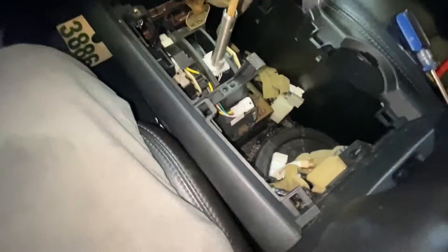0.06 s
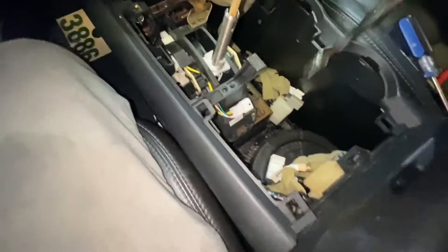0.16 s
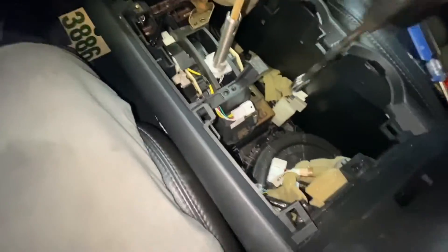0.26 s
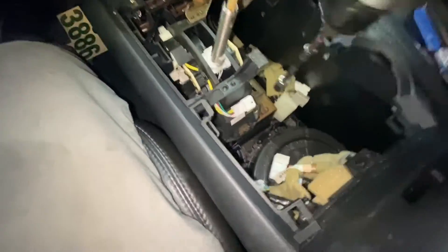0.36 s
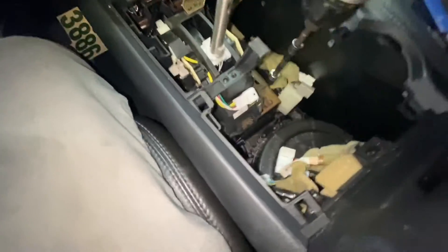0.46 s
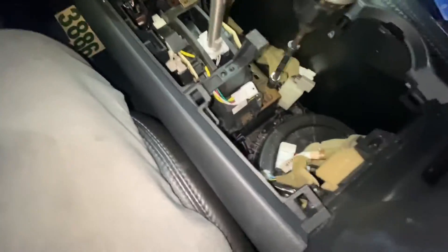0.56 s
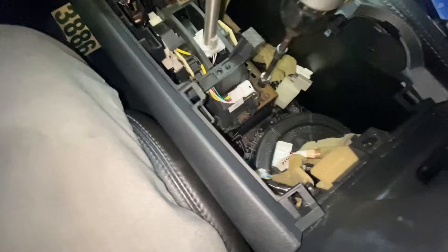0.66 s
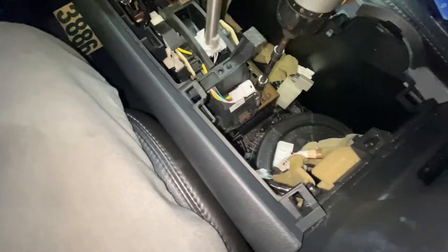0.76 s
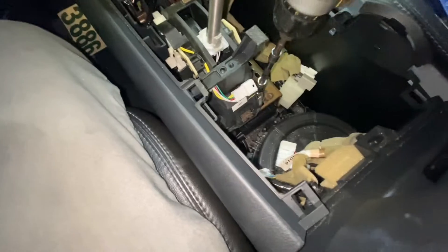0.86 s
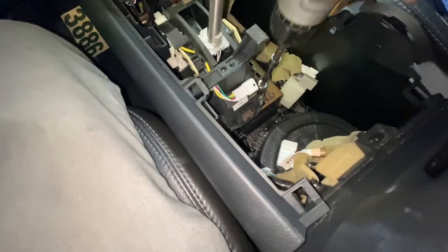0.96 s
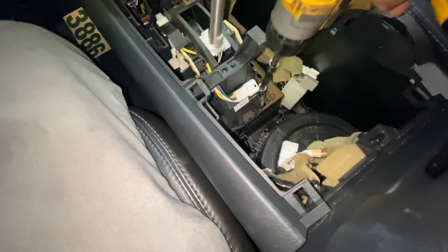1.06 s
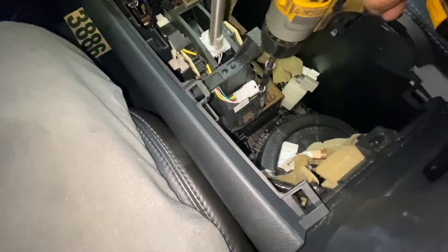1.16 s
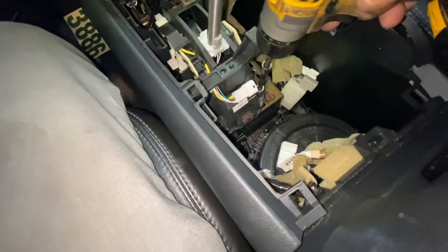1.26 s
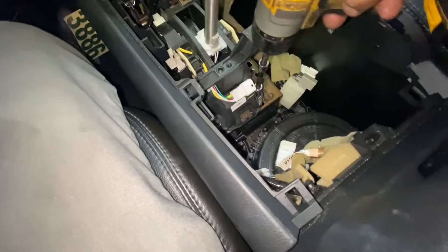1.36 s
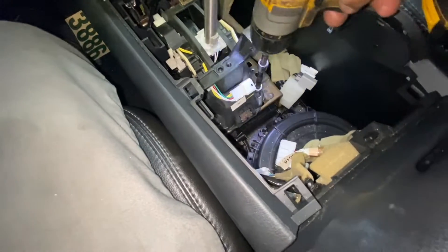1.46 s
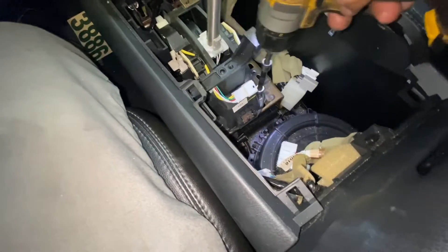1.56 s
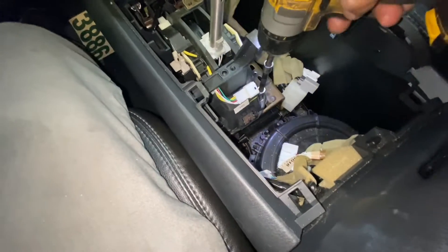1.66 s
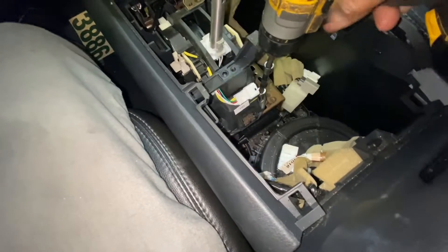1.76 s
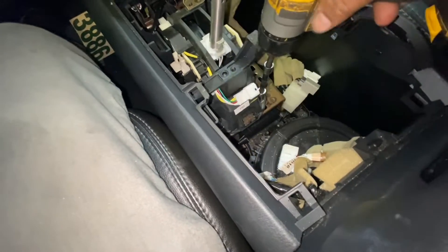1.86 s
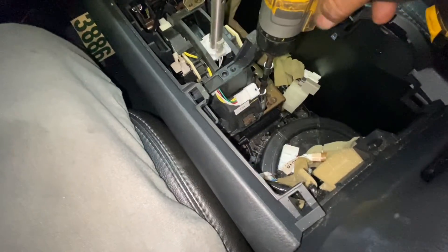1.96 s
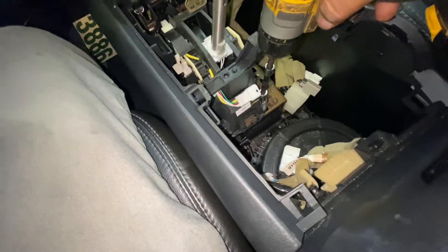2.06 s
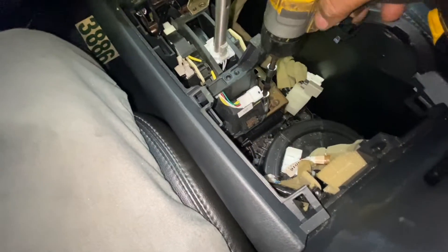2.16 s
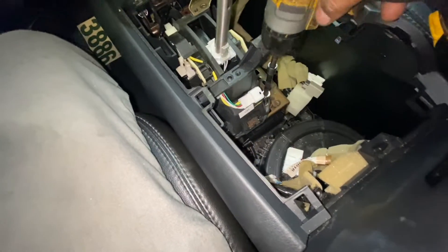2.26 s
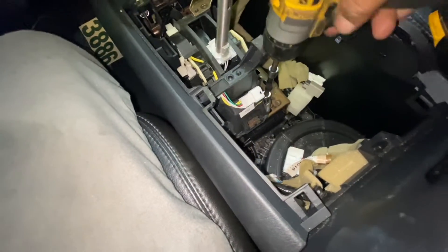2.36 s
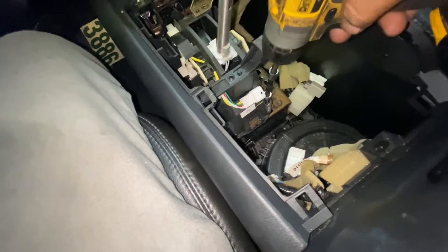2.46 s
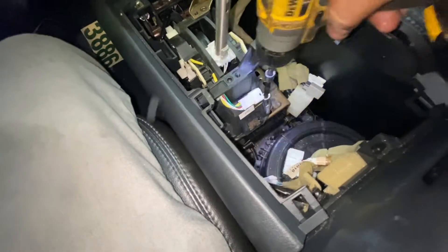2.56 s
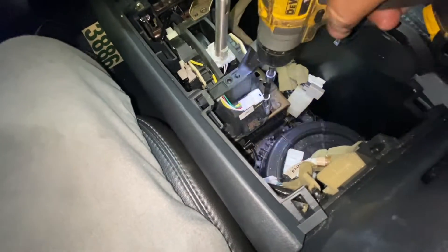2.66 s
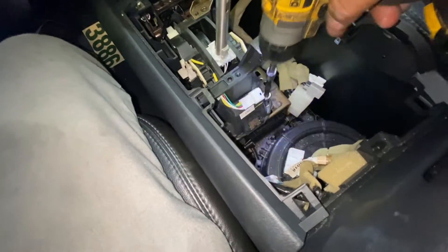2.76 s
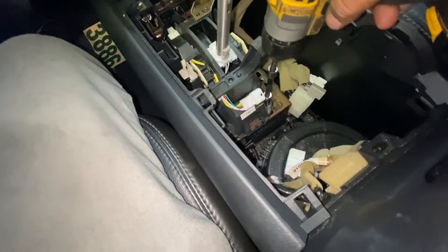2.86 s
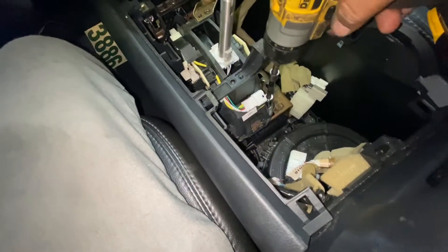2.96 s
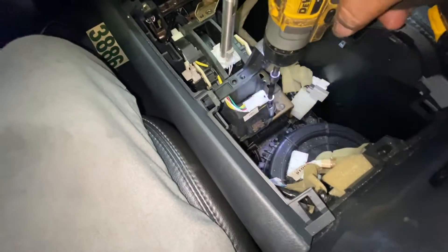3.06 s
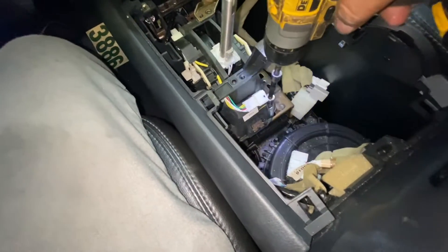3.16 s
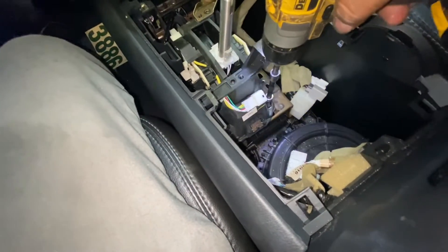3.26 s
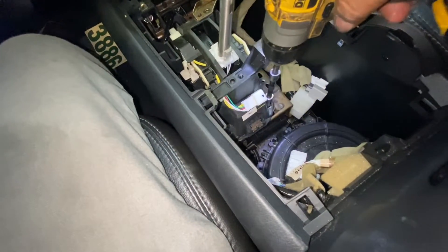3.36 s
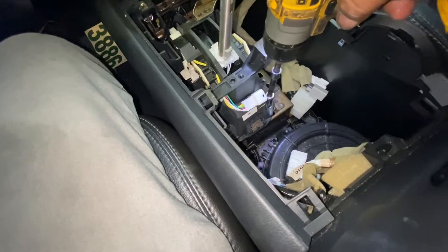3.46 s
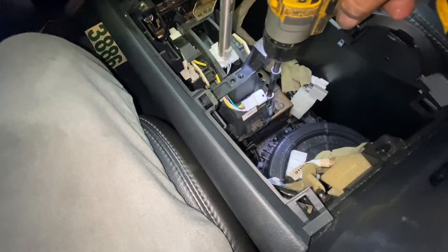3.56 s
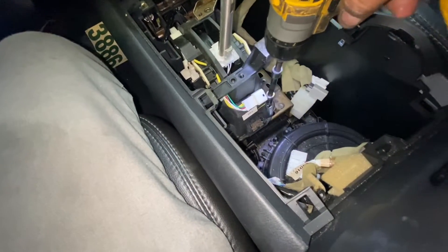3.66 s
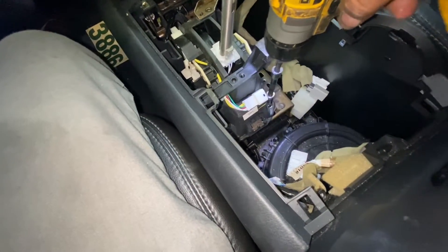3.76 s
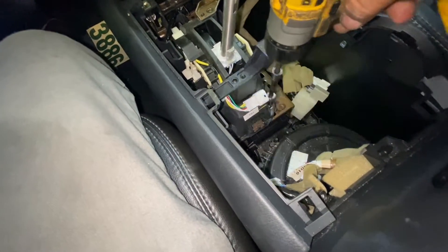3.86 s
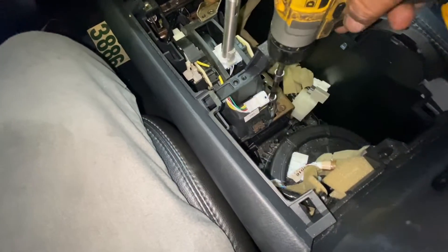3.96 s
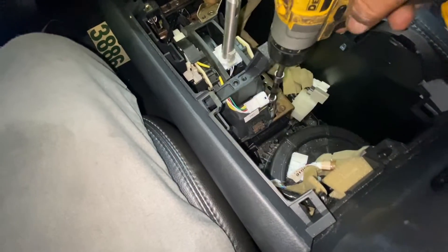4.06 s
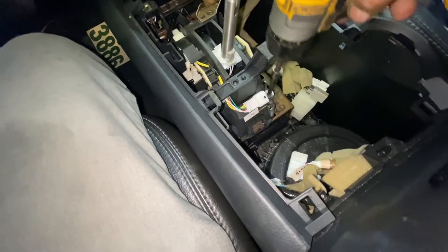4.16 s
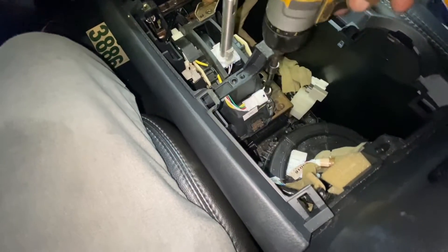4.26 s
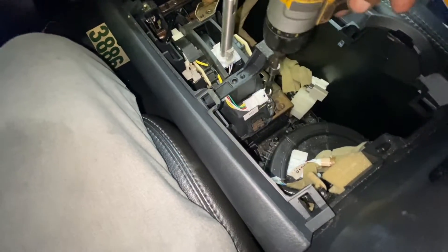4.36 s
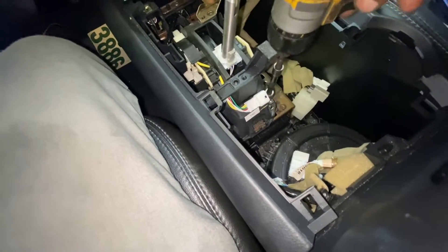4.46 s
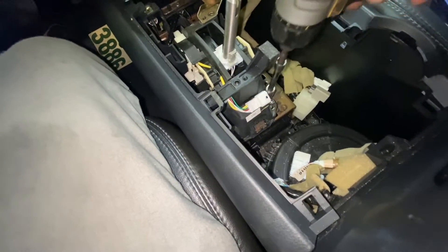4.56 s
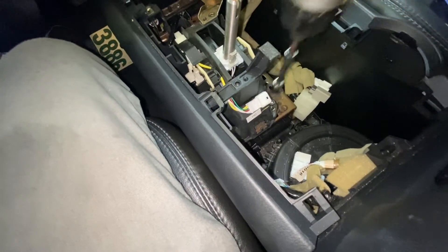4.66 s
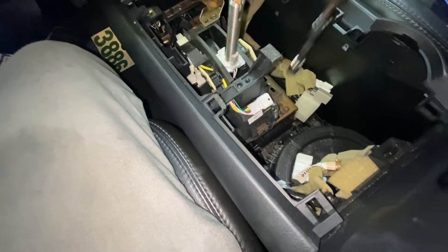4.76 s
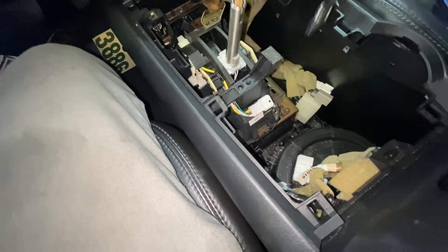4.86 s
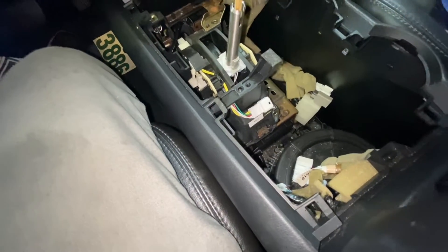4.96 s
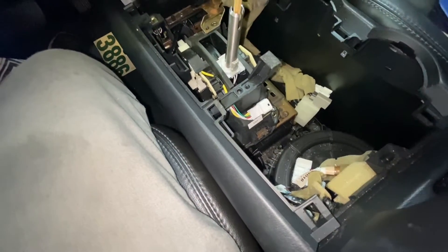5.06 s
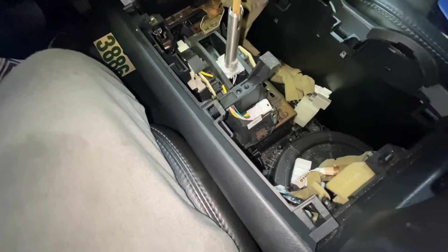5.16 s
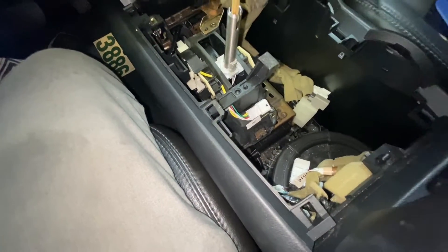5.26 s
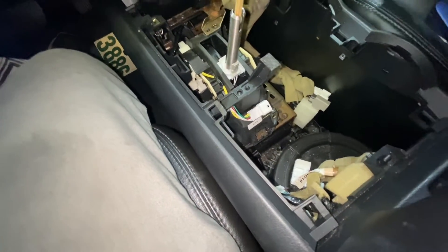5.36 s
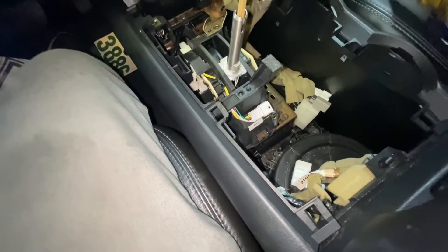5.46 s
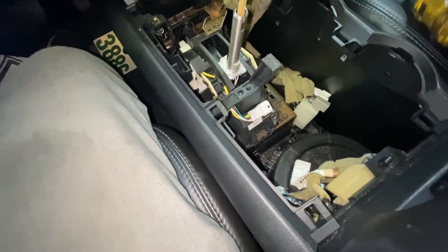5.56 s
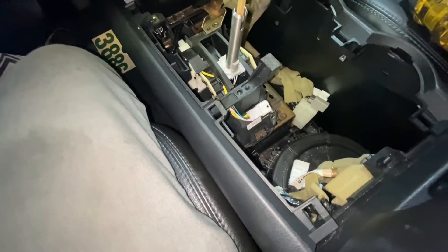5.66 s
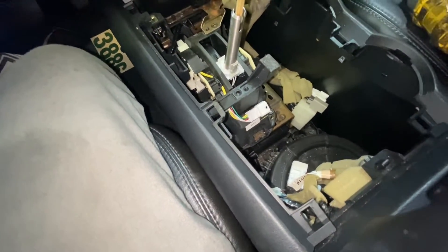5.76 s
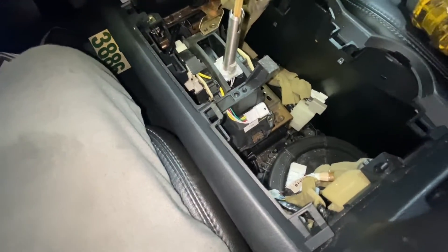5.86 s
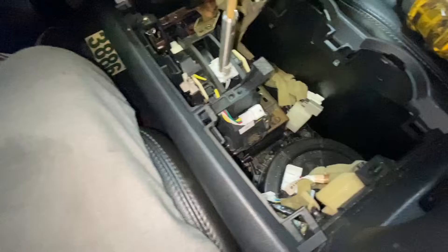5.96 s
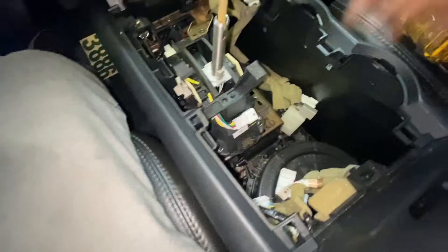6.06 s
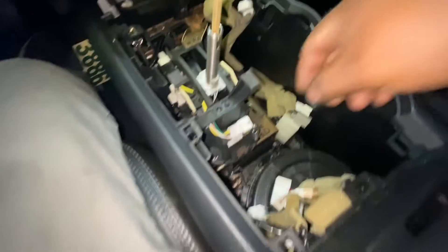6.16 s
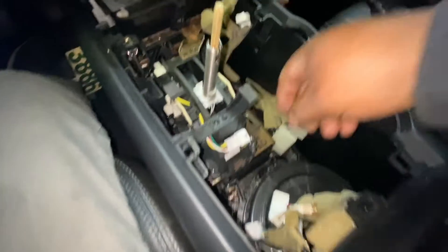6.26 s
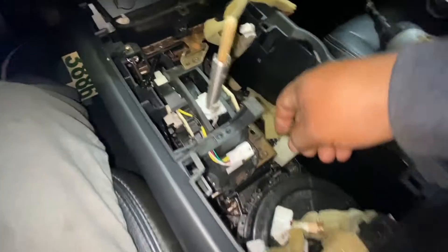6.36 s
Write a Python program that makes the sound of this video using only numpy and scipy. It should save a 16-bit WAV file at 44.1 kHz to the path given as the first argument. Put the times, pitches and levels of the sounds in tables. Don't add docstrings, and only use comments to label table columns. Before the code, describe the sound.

Close in a small padded car cabin, a driver bit ticks and scrapes against metal and plastic. A sharp crack and thump lead into a brief impact rattle; a second follows a second later. Then the motor whirrs steadily for under a second, ending in jolting knocks. Afterwards there are light taps, cloth rustle and a low faint hum. Close stereo microphones, dry sound.

```python
import sys
import numpy as np
from scipy import signal
from scipy.fft import rfft, irfft
from scipy.io import wavfile
from scipy.ndimage import uniform_filter1d

SR = 44100
rng = np.random.default_rng(int(sys.argv[2]) if len(sys.argv) > 2 else 0)


def voltage_ratio(level):
    return 10 ** (np.asarray(level, float) / 20)


def put_to_file(sound):
    columns = np.atleast_2d(sound).T
    safe = np.clip(columns, -1, 1)
    whole_steps = np.round(safe * 32767)
    wavfile.write(sys.argv[1], SR, whole_steps.astype(np.int16))


N = 283122

# f/Hz, level per Hz/dB
HOUSING = [(350, -27.5), (600, 7), (725, -8.5), (787, -0.5), (1680, -2), (2520, -1), (3300, -8),
           (3800, -4.5), (4300, -7), (5300, -2), (6090, -1.5), (7000, -12.5), (7880, -13.5), (9200, -13.5),
           (10200, -6.5), (12000, -11), (13000, -9), (15300, -15.5)]
# f/Hz, level per Hz/dB
CONTACT_TREBLE = [(2060, -32), (3750, -11), (4400, -1), (5020, 1), (6900, -7), (10500, -4.5), (11200, -11),
                  (12200, -22.5), (13600, -14.5), (14600, -18), (15500, -22)]
# t/s, half length/s, rustle level/dB, fine brushing over it/dB
CLOTH_MOVES = [(0.067, 0.094, -65, -21), (0.248, 0.23, -71.5, -17), (0.414, 0.061, -66, -14.5),
               (0.666, 0.043, -72, -11), (0.994, 0.37, -78, -18.5), (1.186, 0.052, -76.5, -8),
               (1.81, 0.082, -82.5, -27), (2.28, 0.022, -66.5, -8.5), (2.306, 0.012, -56, -33),
               (2.491, 0.019, -67, -3.5), (2.858, 0.053, -78, -36), (3.939, 0.057, -102, -65),
               (4.085, 0.063, -93, -30), (4.487, 0.021, -80.5, -24), (5.43, 0.12, -79, -7.5),
               (0.154, 0.047, -74, -29), (5.61, 0.27, -99, 2), (.31, 0.027, -74, -3)]


def motor():
    # t/s, level/dB
    pulls = [
        [(1.38, -66), (1.435, -57), (1.49, -50), (1.55, -32.5), (1.63, -33), (1.68, -50), (1.71, -76),
         (1.76, -80)],
        [(2.45, -79), (2.49, -57), (2.52, -27.5), (2.64, -34.5), (2.665, -41.5), (2.75, -42.5), (2.785, -51.5),
         (2.81, -67), (2.86, -87.5)],
        [(3.01, -74.5), (3.04, -56), (3.075, -37.5), (3.61, -37.5), (3.7, -37), (3.83, -37.5), (3.86, -68),
         (3.89, -96), (3.94, -88)],
    ]
    grip_levels = [-23.5, -27.5, -29]
    # t/s, shaft speed f/Hz, whine level/dB
    spin = [(3.05, 201.6, -51), (3.15, 242.2, -35.5), (3.235, 264.2, -37.5), (3.298, 264.4, -34),
            (3.622, 269.9, -34.5), (3.68, 258.7, -41), (3.7, 276, -35.5), (3.775, 249.6, -39),
            (3.85, 244.7, -50)]
    # f/Hz, width/Hz, level/dB
    console = [(149, 72, -5), (205, 310, -3.5), (267, 58, -1), (292.7, 21, -4.5), (361.8, 36, -8),
               (483, 18, -11.5), (562, 270, -18)]
    # f/Hz, width/Hz, level/dB
    frame = [(100.6, 7.6, 1), (133.4, 43, -9)]
    full_effort_db, shake_share, settle_db_per_s = -33.5, 0.75, 334.5
    bit_hz = 14.1
    t = np.arange(N) / SR

    spinning, (shaft_hz, whine_db) = curves(spin)
    turns = np.cumsum(shaft_hz) / SR
    whirr = gear_whirr(spinning, turns)
    wobble = 1 + (.2 + .4 * spinning) * np.cos(2 * np.pi * bit_hz * (t - 3.175))
    shake = evened(body(grainy(1.3, size=200), console) * wobble)

    out = np.zeros(N)
    fall = settle_db_per_s * t
    for rows, grip_db in zip(pulls, grip_levels):
        gate, (whirr_db,) = curves(rows)
        drive_db = grip_db + shake_share * (whirr_db - full_effort_db)
        shake_db = np.maximum.accumulate(drive_db + fall) - fall
        out += gate * (voltage_ratio(whirr_db + 2.0) * whirr + voltage_ratio(shake_db - 2.0) * shake)

    span = spinning > 0
    out[span] += (spinning * voltage_ratio(whine_db))[span] * shaft_whine(turns[span])
    out += spinning * voltage_ratio(shake_db - 8.0) * evened(body(grainy(1.2, size=400), frame) * wobble)
    return out


def gear_whirr(spinning, turns):
    grind = patchy(grainy(0.72, size=240), spread_db=3.5)
    pulse = np.cos(2 * np.pi * turns)
    treble = signal.butter(2, 6500, "highpass", fs=SR, output="sos")
    treble_pulses = signal.sosfilt(treble, grind * pulse)
    return colour(grind * (1 + .4 * pulse) + 1.1 * spinning * treble_pulses, HOUSING)


def shaft_whine(turns):
    # multiple, level/dB
    multiples = [(3, -13.5), (20, -6), (22, -15), (23, -4.5), (24, -5.5), (29, -6), (30, -15), (31, 0.5),
                 (32, -6), (33, -3.5), (34, 0.5), (35, -11), (36, -9), (37, 7), (38, -19), (39, 2),
                 (40, 5.5), (41, -23), (42, -1.5), (43, -11), (44, -3), (45, 5.5)]
    waver = uniform_filter1d(rng.standard_normal((len(multiples), len(turns))), 900, axis=1)
    lines = np.zeros(len(turns))
    for (k, db), w in zip(multiples, waver):
        lines += voltage_ratio(db) * np.cos(2 * np.pi * k * turns + 24 * w + k * k) * (1 + 6 * w)
    return evened(colour(lines, HOUSING))


def patchy(x, spread_db):
    z = signal.stft(x, nperseg=512)[2]
    field = rng.standard_normal(z.shape[::-1])
    field = uniform_filter1d(field, size=7, axis=0)
    field = uniform_filter1d(field, size=6, axis=1)
    return evened(signal.istft(z * voltage_ratio(spread_db * evened(field).T), nperseg=512)[1][:N])


def blows():
    # t/s, knock level/dB, treble level/dB
    first_rattle = [(1.508, -26.5, -35.5), (1.5151, -8.5, -24), (1.5195, -20, -29), (1.5278, -20, -25.5),
                    (1.5357, -11.5, -9), (1.5487, -8, -23.5), (1.5537, -16.5, -24), (1.5567, -12.5, -26),
                    (1.5621, -6, -16), (1.5725, -8.5, -9), (1.581, -10, -17.5), (1.5871, -11, -12.5),
                    (1.5923, -15, -21), (1.5968, -8.5, -10), (1.6048, -7.5, -18), (1.6108, -17.5, -12),
                    (1.6211, -2, -22.5), (1.6246, -21, -22), (1.6296, -9, -18.5), (1.6352, -17.5, -13),
                    (1.6476, -11.5, -27.5), (1.6521, -21, -28), (1.658, -13, -25.5), (1.661, -22.5, -37),
                    (1.6684, -26.5, -35), (1.6727, -16.5, -15.5), (1.6808, -24.5, -45), (1.6878, -34, -67)]
    second_rattle = [(2.4957, -29, -39.5), (2.5024, -21, -27.5), (2.5051, -17, -35.5), (2.5139, -10.5, -12),
                     (2.5189, -12, -13), (2.5256, -6, -17), (2.5301, -12, -21), (2.5337, -13, -11),
                     (2.5436, -12, -10), (2.5509, -7, -12.5), (2.5588, -10, -14), (2.5667, -13, -7),
                     (2.574, -11, -14), (2.5806, -18, -9.5), (2.5875, -16.5, -19.5), (2.5949, -19.5, -8.5),
                     (2.604, -12, -17), (2.6092, -17.5, -15), (2.6162, -15, -18.5), (2.6236, -21, -11),
                     (2.6322, -10.5, -21), (2.6346, -16.5, -27), (2.6403, -18, -19), (2.6492, -10.5, -22),
                     (2.6514, -21, -25.5), (2.6578, -29.5, -38.5)]
    # f/Hz, width/Hz, level/dB
    anvil = [(1100, 580, -0.5), (1690, 460, 4), (2360, 220, 6), (2900, 220, -4.5), (5050, 630, -7)]
    mid, top, t = np.zeros((3, N)), np.zeros(N), np.arange(900) / SR
    knock = np.exp(-((t - .0004) / .00004) ** 2)
    rows = first_rattle + second_rattle
    noise = rng.standard_normal((len(rows), 2, len(t)))
    for k, ((s, db, treble_db), (a, b)) in enumerate(zip(rows, noise)):
        grit = voltage_ratio(-60 * t / 0.01) * a
        grind = voltage_ratio(-60 * t / 0.014) * np.minimum(t / .0009, 1) * b
        add(mid[k % 3], s, voltage_ratio(db - 6.0) * (1.35 * knock + grit))
        add(top, s - .0006, voltage_ratio(treble_db - 3.2) * (.4 * knock + grind))
    out = colour(top, CONTACT_TREBLE)
    for part, seat in zip(mid, (.9, 1.0, 1.12)):
        out += body(part, [(hz * seat, w, db) for hz, w, db in anvil])
    return out


def switching():
    # t/s, level/dB, lower tone under it/dB
    trigger = [
        [(1.361, -56.5, -7), (1.385, -47.5, -1.5), (1.4, -55, -17), (1.447, -45.5, -8.5)],
        [(2.471, -50.5, -16.5), (2.495, -52.5, -10)],
    ]
    switch_hz = 3950
    turn, out = 2 * np.pi * switch_hz * np.arange(N) / SR, np.zeros(N)
    for rows in trigger:
        gate, (db, under_db) = curves(rows)
        out += gate * voltage_ratio(db + 0.5) * (np.sin(2 * turn) + voltage_ratio(under_db) * np.sin(turn))
    return out


def bit_taps():
    skid_s, skid_db, skid_rise_s, touch_rise_s = .012, -24, 0.004, .0021
    rows = touches()
    mid, top, t = np.zeros(N), np.zeros(N), np.arange(6000) / SR - skid_s
    noise = rng.standard_normal((len(rows), 3, len(t)))
    plastic = signal.butter(2, [500, 4200], "bandpass", fs=SR, output="sos")
    tick = 1 + 0.33 * np.exp(-((t - .0015) / 0.0031) ** 2)
    for (s, db, hz, t60, treble_db), (a, b, c) in zip(rows, noise):
        skid = voltage_ratio(skid_db + 0.78 * treble_db) * np.exp(np.minimum(t, 0) / skid_rise_s)
        decay = voltage_ratio(-60 * np.maximum(t, 0) / np.clip(t60, .008, .3))
        fade = decay * np.clip(t / touch_rise_s, skid, 1)
        struck = signal.butter(1, [.88 * hz, 1.12 * hz], "bandpass", fs=SR, output="sos")
        ring = 0.5 * evened(signal.sosfilt(struck, c)) + 0.46 * evened(signal.sosfilt(plastic, a))
        start = max(s - skid_s - .0006, 0)
        add(mid, start, voltage_ratio(db - 4.5) * fade * tick * ring)
        add(top, start, voltage_ratio(db + treble_db - 9.5) * fade ** np.where(t > .002, 1.7, 1) * tick * b)
    return mid + colour(top, CONTACT_TREBLE)


def touches():
    # t/s, peak level/dB, ring f/Hz, t60/s
    steel = [(.0134, -27.5, 2390, 0.022), (.069, -37.5, 833.3, 0.053), (0.37, -64, 1469, 0.18),
             (.3256, -37.5, 2900, 0.073), (.386, -29.5, 1250, 0.027), (.5344, -50.5, 1583, 0.049),
             (.9377, -24, 3520, 0.093), (.994, -14.5, 3300, 0.058), (1.0159, -32, 3600, 0.023),
             (1.0263, -24.5, 1100, 0.069), (1.3188, -49.5, 926, 0.031), (1.4475, -12, 3020, 0.044),
             (1.4505, -14, 4620, 0.046), (2.5, -29, 840, 0.03), (4.0422, -45, 2280, 0.068),
             (4.1051, -42.5, 1400, 0.068), (2.432, -52, 3600, 0.043), (2.99, -42, 4030, 0.014),
             (5.255, -56, 965, 0.02), (5.2699, -51, 955, 0.031), (1.4965, -18, 1970, 0.031),
             (.5115, -51, 3500, .02), (.2135, -58.5, 3600, 0.011), (3.921, -55, 3700, .025),
             (4.0335, -50, 3600, .03), (4.972, -62, 3600, .015), (6.097, -57, 3800, .012), ]
    fittings = [(.2093, -34.5, 2240, 0.078), (.3596, -44, 2230, 0.018), (.4369, -36.5, 2360, 0.068),
                (.4601, -29, 2930, 0.044), (.6654, -24, 2730, 0.019), (.7397, -34, 1730, 0.017),
                (.9815, -22.5, 4650, .05), (.985, -16, 4440, 0.071), (1.4525, -15.5, 1520, 0.062),
                (4.1475, -18.5, 2330, 0.025), (3.632, -25, 4250, 0.039), (3.652, -23.5, 3900, 0.019),
                (2.4923, -27, 2200, 0.045), (2.7306, -29.5, 1740, 0.042), (3.6257, -21, 2300, 0.057),
                (3.6462, -15, 1256, 0.048), (3.7741, -19, 3860, 0.056), (3.796, -19.5, 1100, 0.14),
                (4.0554, -38.5, 2160, 0.13), (4.498, -65, 2100, 0.061), (5.589, -35, 2320, 0.062),
                (5.155, -56, 2470, 0.028), (5.4959, -46, 930, 0.033), ]
    plastic = [(.0987, -34, 2600, 0.029), (.633, -28, 2256, 0.032), (2.0393, -45, 1827, 0.038),
               (2.2953, -26, 1690, 0.033), (2.7467, -23.5, 1100, 0.035), (2.7744, -33.5, 2300, 0.052),
               (3.0356, -37.5, 2270, 0.5), (3.7, -19, 1010, 0.035), (3.7224, -17, 1280, 0.044),
               (4.3224, -28, 2100, 0.023), (4.148, -17.5, 5900, 0.016), (4.149, -26.5, 4050, 0.028),
               (.03, -38, 1900, .02), (.052, -42, 2200, .02), (.4495, -36, 3800, .02),
               (.844, -47, 3100, .03), (4.4645, -47, 2090, .07), (5.2066, -53, 1250, .04), ]
    kinds = (steel, 5), (fittings, -8), (plastic, -20.5)
    return [(*row, treble_db) for rows, treble_db in kinds for row in rows]


def thumps():
    # t/s, peak level/dB, f/Hz, t60/s
    panels = [(0.99, -18.5, 217.8, 0.078), (1.0333, -10.5, 293.2, 0.039), (1.141, -20.5, 260.5, 0.018),
              (1.452, -5.5, 229.8, 0.055), (1.453, -15, 396, 0.026), (1.463, -12, 191.4, .06),
              (1.908, -34, 209, 0.048), (2.166, -37.5, 205, 0.085), (2.296, -21, 242, 0.033),
              (2.517, -16, 236.6, 0.12), (2.876, -21.5, 126.8, 0.041), (3.629, -18.5, 365.4, 0.14),
              (3.646, -16.5, 99.1, 0.11), (3.697, -26, 478, 0.2), (3.717, -13.5, 105.2, 0.08),
              (3.776, -22, 91.7, 0.068), (3.802, -15.5, 100.7, 0.11), (3.979, -32.5, 116.4, 0.063),
              (4.153, -33, 504, 0.05), (5.485, -44, 91.3, 0.15), (5.591, -33.5, 562, 0.05),
              (5.769, -48.5, 98.7, 0.11), (5.813, -35, 113, 0.074), (6.399, -40.5, 135.6, 0.091)]
    more_knocks = [(5.8, -48, 280, 0.026), (4.7, -71, 540, 0.022), (5.6, -71, 414, 0.034),
                   (5.771, -37, 310, 0.04), (6.4, -47, 545, 0.042), (6.366, -35.5, 900, 0.0091),
                   (3.4, -48, 510, 0.081), (1, -32.5, 980, 0.011), (3.97, -44.5, 1350, 0.022),
                   (4.929, -45.5, 510, 0.017), (3.72, -15.5, 290, 0.056), (3.8, -19.5, 320, 0.069),
                   (3.648, -15.5, 140, 0.074), (2.535, -14.5, 250, 0.055), (2.552, -21, 220, 0.055),
                   (3.985, -46, 210, .08), (4.045, -47, 280, .1), ]
    out, t = np.zeros(N), np.arange(12000) / SR
    rows = panels + more_knocks
    detune = rng.uniform(.9, 1.0, (len(rows), 2))
    for (s, db, hz, t60), (a, b) in zip(rows, detune):
        swing = np.sin(2 * np.pi * hz * t)
        swing += 0.22 * np.sin(2 * np.pi * 1.7 * a * hz * t)
        swing += 0.36 * np.sin(2 * np.pi * 0.52 * b * hz * t)
        onset = np.minimum(t * max(hz, 280), 1)
        add(out, s, voltage_ratio(db - 60 * t / np.clip(t60, .008, .5)) * onset * swing)
    return out


def spring():
    # t/s, peak level/dB, f/Hz, t60/s
    ringing = (4.1, -56, 96.9, 5.0)
    s, db, hz, t60 = ringing
    t = np.maximum(np.arange(N) / SR - s, 0)
    ends = np.minimum(t / .04, 1) * np.clip((1.3 - t) / .3, 0, 1)
    return voltage_ratio(db - 60 * t / t60) * ends * np.sin(2 * np.pi * hz * t)


def cloth():
    # f/Hz, level per Hz/dB
    fabric = [(350, -32.5), (600, -15), (679, -13.5), (925, -16), (1290, -16.5), (1410, -15), (2710, -17),
              (3220, -23.5), (3830, -16), (5090, -19), (5700, -18), (6450, -15.5), (7250, -24.5),
              (8200, -17), (11500, -23.5), (15000, -55.5), (22000, -120)]
    _, _, rustle_db, over_db = np.transpose(CLOTH_MOVES)
    near, *around = (colour(grainy(0.72, size=1500), fabric) for _ in range(3))
    both = np.array([np.roll(near, 20), near]) + voltage_ratio(10.5) * np.array(around)
    coarse = signal.sosfiltfilt(signal.butter(2, 4300, fs=SR, output="sos"), both)
    rustle = np.hypot(swells(rustle_db), voltage_ratio(-79.5)) * evened(coarse)
    brushing = np.hypot(swells(rustle_db + over_db), voltage_ratio(-99)) * evened(both - coarse)
    return voltage_ratio(9.5) * (rustle + brushing)


def swells(db):
    t = np.arange(0, N + 64, 64) / SR
    power = sum(voltage_ratio(2 * d) * np.exp(-((t - s) / half) ** 2) for (s, half, *_), d in zip(CLOTH_MOVES, db))
    return np.interp(np.arange(N) / SR, t, np.sqrt(power))


def room():
    # t/s, hum level/dB
    weight = [(0, -63.5), (.45, -59), (.6, -68.5), (.95, -59.5), (1.09, -44), (1.3, -61), (1.9, -51.5),
              (2.08, -63), (2.36, -47.5), (2.47, -58.5), (2.84, -44.5), (2.96, -56), (3.94, -51.5),
              (4.3, -66), (5.4, -66.5), (5.6, -53), (5.72, -60.5), (6.42, -63)]
    # f/Hz, level per Hz/dB
    hum = [(25, -28), (36, -5.5), (46, -1.5), (54, 6), (64, -6.5), (80, -6.5), (97, -14), (112, -4.5),
           (140, -34.5)]
    foam = [(76, -30.5), (130, -4.5), (483, -9.5), (700, -23.5), (900, -17.5), (1170, -48.5), (1980, -120)]
    _, (hum_db,) = curves(weight)
    moving = swells(np.transpose(CLOTH_MOVES)[2])
    creak = np.hypot(voltage_ratio(-68.5 + 0.82 * (hum_db + 59.5)), voltage_ratio(7.5) * moving)
    low, apart = (voltage_ratio(hum_db) * colour(rng.standard_normal(N), hum, size=32768)
                  + creak * colour(grainy(3.2, size=900), foam) for _ in range(2))
    return spring() + low + voltage_ratio(-6.5) * apart * [[1], [-1]] + cloth()


def heard(x, tail_db, side_db, drift_hz):
    echoes = voltage_ratio(tail_db) * tail(count=2)
    hz, t = np.fft.rfftfreq(N, 1 / SR), np.arange(N) / SR
    side = signal.oaconvolve(x, echoes[1])[:N]
    for k, bends in enumerate(rng.uniform(-1.008, 1, (3, 24))):
        share = np.sqrt(2 / 3) * np.cos(2 * np.pi * (drift_hz * t + k / 3))
        late = 0.000498 + 0.00087 * np.interp(hz, np.linspace(0, SR / 2, len(bends)), bends)
        smear = np.exp(-2j * np.pi * np.cumsum(late) * hz[1] + 1j * k)
        side += voltage_ratio(side_db) * irfft(rfft(x * share) * smear, N)
    side = signal.sosfilt(signal.butter(3, 430, "highpass", fs=SR, output="sos"), side)
    return x + signal.oaconvolve(x, echoes[0])[:N] + side * [[1], [-1]]


def tail(count):
    # f/Hz, t60/s
    cabin = [(100, 0.17), (500, 0.12), (2000, 0.079), (12000, 0.032)]
    echoes = rng.standard_normal((count, 8192)) * (rng.random((count, 8192)) < .1)
    hz, t, z = signal.stft(echoes, SR, nperseg=256)
    fade = voltage_ratio(-60 * t / read(cabin, hz)[:, None])
    out = signal.istft(z * fade, SR, nperseg=256)[1][:, :8192]
    out *= np.minimum(np.arange(8192) / 150, 1)
    return out / np.linalg.norm(out, axis=1)[:, None]


def leaning(x):
    # f/Hz, left over right level/dB
    shading = [(60, -7), (110, -4.5), (200, 4.5), (380, -3), (700, 5), (1290, 5.5), (2380, 5.5), (4400, 6),
               (8120, 1), (15000, -3)]
    lean = read(shading, np.fft.rfftfreq(N, 1 / SR))
    return irfft(rfft(x) * voltage_ratio(np.array([lean / 2, -lean / 2])), N)


def evened(x):
    return x / np.sqrt(np.mean(x ** 2) + 1e-20)


def read(points, hz):
    f, value = np.transpose(points)
    return np.interp(np.log(hz + 1), np.log(f + 1), value)


def colour(x, points, size=4096):
    hz = abs(np.fft.fftfreq(size, 1 / SR))
    db = np.where((hz < points[0][0]) | (hz > points[-1][0]), -70, read(points, hz))
    minimum_phase = np.exp(np.conj(signal.hilbert(np.log(voltage_ratio(db)))))
    kernel = np.fft.ifft(minimum_phase).real[:size // 2]
    return signal.oaconvolve(x, kernel / np.linalg.norm(kernel))[:len(x)]


def body(x, peaks):
    t = np.arange(6000) / SR
    kernel = np.zeros(len(t))
    for k, (hz, w, db) in enumerate(peaks):
        kernel += (-1) ** k * voltage_ratio(db) * w * np.exp(-np.pi * w * t) * np.sin(2 * np.pi * hz * t)
    return signal.oaconvolve(x, kernel / np.linalg.norm(kernel))[:len(x)]


def curves(rows):
    s, *columns = np.transpose(rows)
    t = np.arange(N) / SR
    gate = np.interp(t, [s[0], s[0] + .004, s[-1] - .01, s[-1]], [0, 1, 1, 0])
    return gate, [np.interp(t, s, c) for c in columns]


def add(mix, s, sound):
    part = mix[round(s * SR):][:len(sound)]
    part += sound[:len(part)]


def grainy(spread_db, size):
    flicker = evened(uniform_filter1d(rng.standard_normal(N), size))
    return evened(rng.standard_normal(N) * voltage_ratio(spread_db * flicker))


def scene():
    tool = heard(motor() + blows() + switching(), tail_db=-13, side_db=-.8, drift_hz=0.676)
    panels = heard(thumps(), tail_db=-10.0, side_db=-5.5, drift_hz=0.45)
    contacts = heard(bit_taps(), tail_db=-9.5, side_db=-.8, drift_hz=2.7)
    return voltage_ratio(-6.0) * leaning(tool + panels + contacts) + room()


def low_pass(x):
    return signal.sosfilt(signal.butter(12, 16360, fs=SR, output="sos"), x)


def record(dry):
    hz = np.fft.rfftfreq(N, 1 / SR)
    response_db = -35 * np.exp(-((hz - 12050) / 380) ** 4)
    response_db -= 16 * np.clip((hz - 15500) / 700, 0, 2)
    response_db -= 36 * np.clip(1 - hz / 48, 0, 1)
    limited = 1.67 * np.tanh(dry / 0.55)
    return low_pass(irfft(rfft(limited) * voltage_ratio(response_db), N))


dry = scene()
out = record(dry)
put_to_file(out)
```